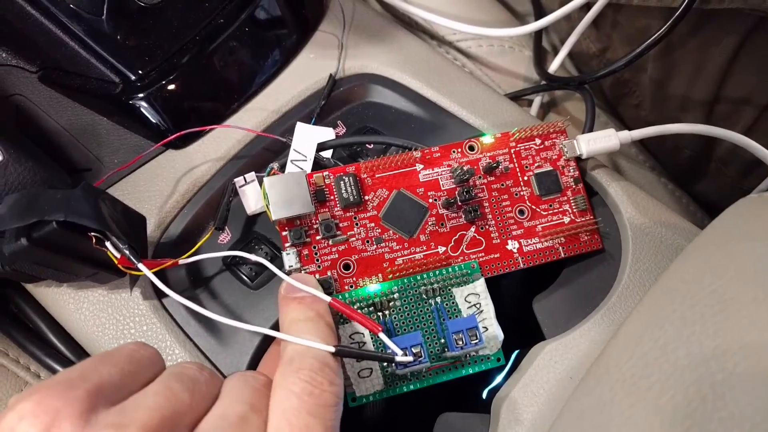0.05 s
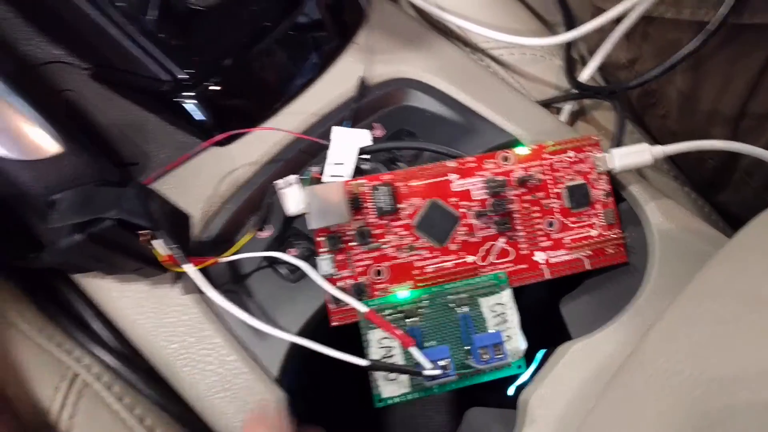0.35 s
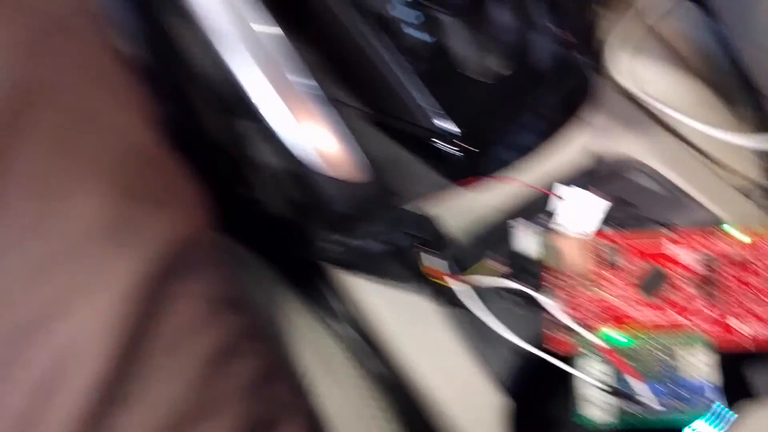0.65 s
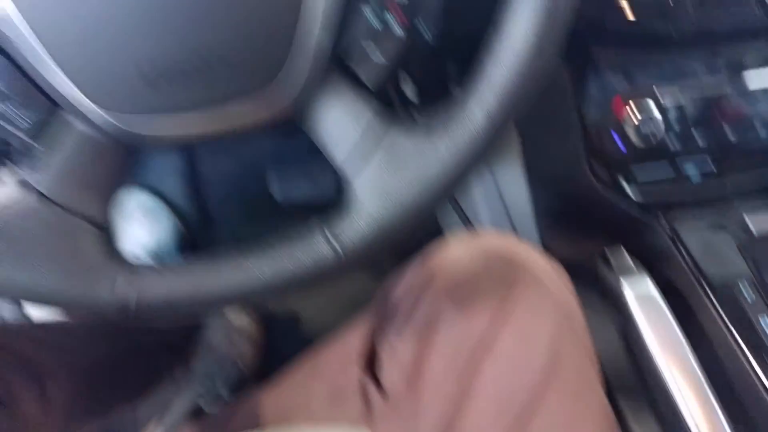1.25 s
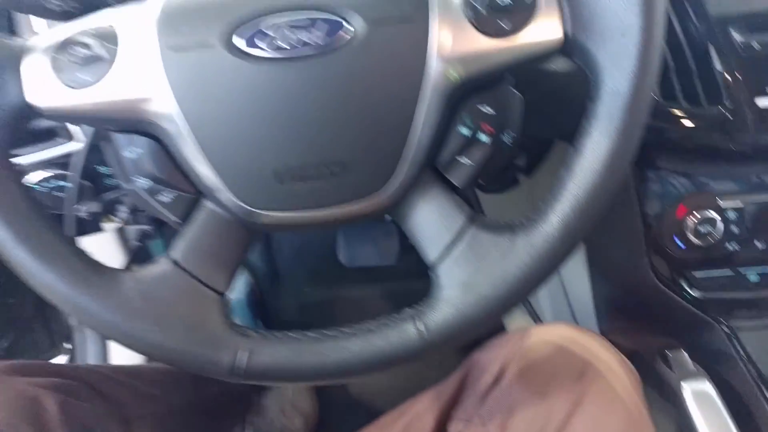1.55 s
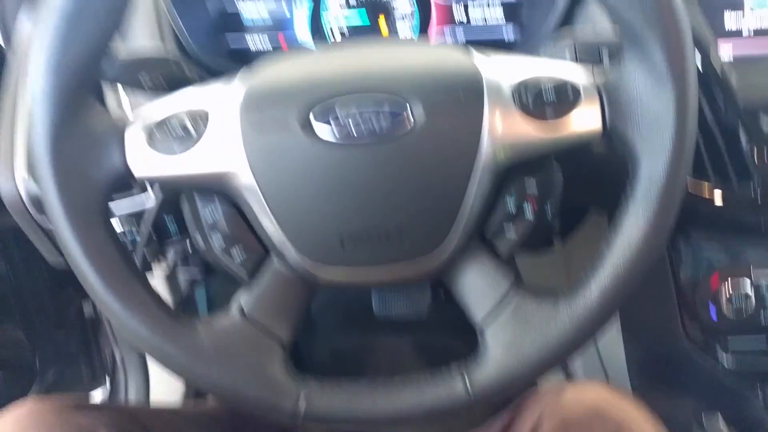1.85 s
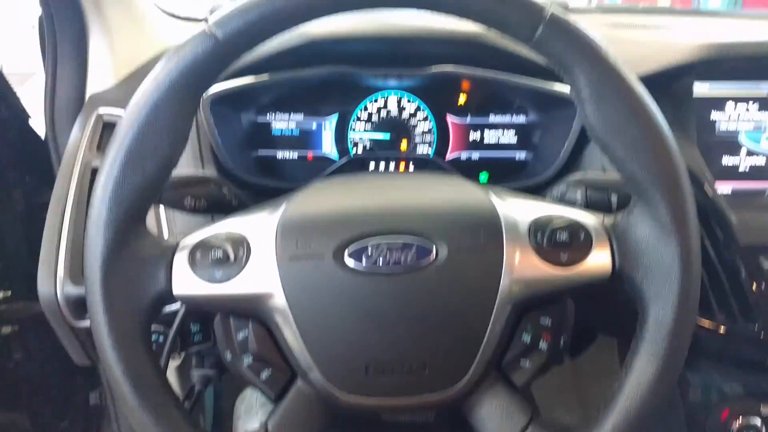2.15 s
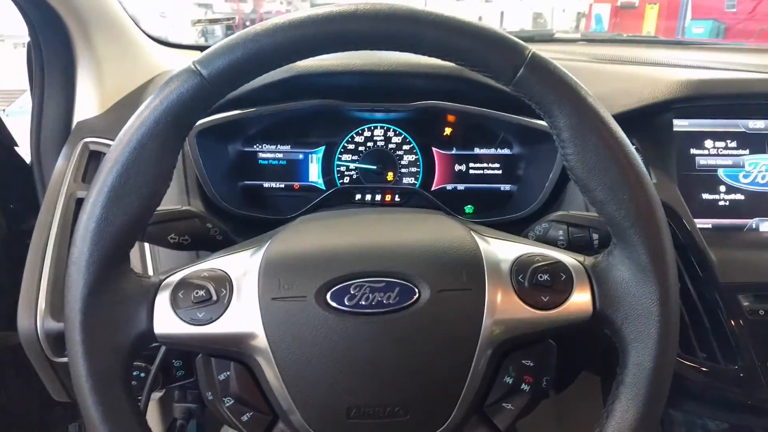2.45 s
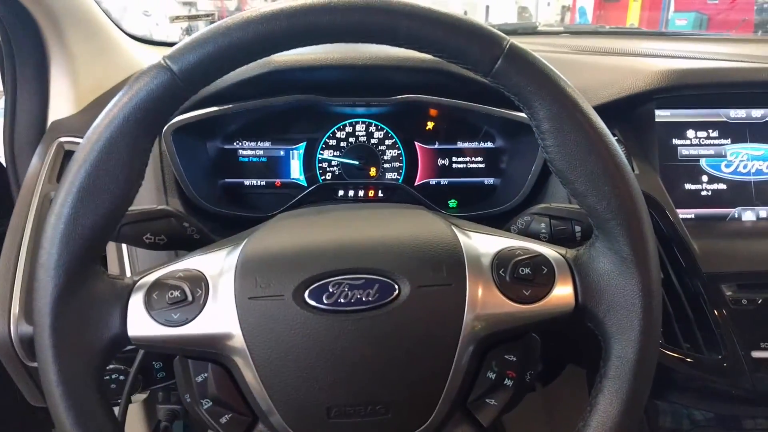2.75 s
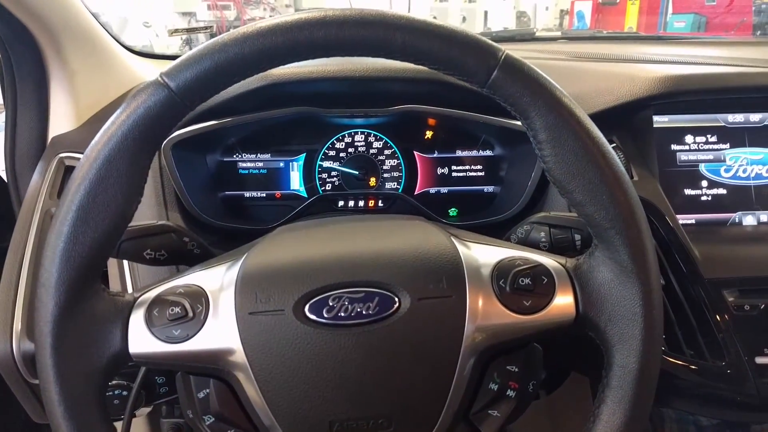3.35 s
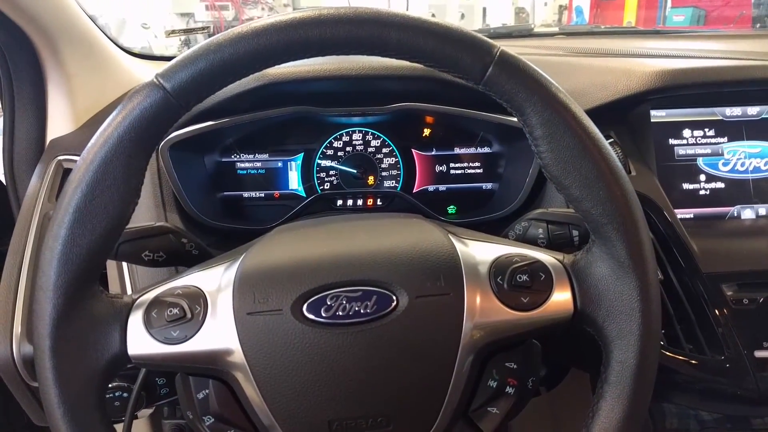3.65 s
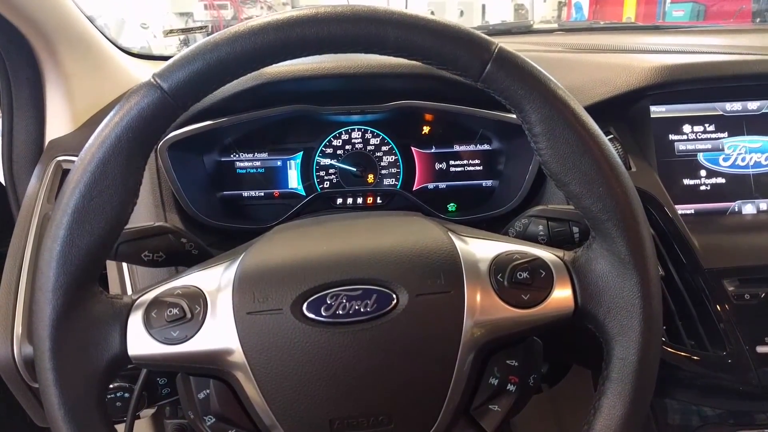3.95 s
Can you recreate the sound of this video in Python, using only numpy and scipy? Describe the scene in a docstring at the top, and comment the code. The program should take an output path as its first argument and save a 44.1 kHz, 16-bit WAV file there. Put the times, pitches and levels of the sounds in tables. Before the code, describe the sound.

An electric car's motor whines, rising in pitch over a swelling rumble and a few clicks.

```python
"""An electric car stands in a workshop, its motor at a crawl over a low hum and quiet cabin air.
As the motor starts to run up, plastic ticks, a hand lets go of a circuit board with a few taps,
clothing swishes and rubs the seat as the driver turns, and the console takes a few knocks.
The drivetrain's rumble, hiss and boom swell, the gears whine upward and the inverter sings above them
in clusters of rising side tones. One more sharp tick comes just past halfway; the motor keeps climbing."""
import sys
import numpy as np
from scipy import signal
from scipy.fft import rfft, irfft
from scipy.io import wavfile

SR = 44100
rng = np.random.default_rng(int(sys.argv[2]) if len(sys.argv) > 2 else 0)


def bounce(signal):
    """Save signal as a 16-bit WAV file at the path given by the first command-line argument."""
    frames = np.transpose(np.atleast_2d(signal))
    limited = np.clip(frames, -1, 1)
    pcm = np.round(limited * 32767).astype(np.int16)
    wavfile.write(sys.argv[1], SR, pcm)


N = 176400
T = np.arange(N) / SR
WORKSHOP_T60_S, CABIN_T60_S = .8, 0.037


def from_db(db):
    """Decibels to gain."""
    return 10 ** (np.asarray(db) / 20)


def rms_one(x):
    """Scale to an rms of 1."""
    return x / np.sqrt(np.mean(x ** 2) + 1e-20)


def drift(rate_hz):
    """Smooth random wander, rms 1."""
    step, settle = 40, 2000
    pole = np.exp(-2 * np.pi * step * rate_hz / SR)
    white = rng.standard_normal(N // step + settle + 2)
    slow = signal.lfilter([1], [1, -2 * pole, pole * pole], white)[settle:]
    return np.interp(np.arange(N) / step, np.arange(len(slow)), rms_one(slow))


def noise(colour):
    """White noise through an EQ curve, rms 1."""
    hz, db = np.transpose(colour)
    bins = np.maximum(np.fft.rfftfreq(N, 1 / SR), 1)
    gain = from_db(np.interp(np.log(bins), np.log(hz), db)) * np.minimum(bins / hz[0], 1)
    return rms_one(irfft(rfft(rng.standard_normal(N)) * gain, N))


def tone(hz, db):
    """A sine that follows a pitch and an rms level."""
    return np.sqrt(2) * from_db(db) * np.sin(2 * np.pi * (np.cumsum(hz) / SR + rng.random()))


def room(x, t60, wet):
    """Direct sound plus a diffuse dying tail, at about the same total power."""
    tail = rng.standard_normal(SR) * from_db(-60 * T[:SR] / t60)
    reverb = signal.fftconvolve(x, tail / np.linalg.norm(tail))[:N]
    return (x + wet * reverb) / np.hypot(1, wet)


# Mains tones at 60 and 240 Hz, plus a cabin resonance at 172 Hz: pitch_hz, level_db
HUM_TONES = [(60, -49), (172, -61), (240, -62)]
# Room tone EQ: freq_hz, gain_db
CABIN_AIR_EQ = [(25, -17), (55, -0.5), (100, -3.5), (170, -6), (260, -10.5), (350, -20.5), (600, -25.5),
                (1000, -29.5), (2300, -32.5), (5000, -34), (6800, -29), (8400, -23.5), (10500, -33),
                (13000, -37.5), (16000, -49.5)]

def hum_and_air(waver_db=2.2, air_db=-50.5):
    """The bed: a wavering low hum over the quiet air of the cabin."""
    hum = sum(tone(np.full(N, hz), db + waver_db * drift(10.7)) for hz, db in HUM_TONES)
    return hum + from_db(air_db) * noise(CABIN_AIR_EQ)


# The five speed points of the drive's level curves: motor_hz
SPEED_POINTS = [30, 48, 70, 95, 114]

def at_speed(motor_hz, levels_db):
    """Ride a level in dB with the motor speed."""
    return np.interp(motor_hz, SPEED_POINTS, levels_db)


# Rumble and hiss swells: level_db at each speed point
RUMBLE_LEVELS = [-60.5, -48.5, -43, -40, -41]
HISS_LEVELS = [-69.5, -63.5, -59, -52, -50.5]
# Their EQ curves: freq_hz, gain_db
RUMBLE_EQ = [(25, -15), (60, -7), (90, -2), (135, 2.5), (190, -6), (260, -7), (340, -21.5), (500, -42.5),
             (1000, -67), (3000, -92)]
HISS_EQ = [(150, -13), (330, -3), (520, -6.5), (750, -19.5), (1050, -21.5), (1700, -14), (2300, -26),
           (2600, -18), (2850, -24.5), (3600, -23), (4300, -24.5), (5000, -25.5), (5800, -23.5),
           (6800, -27.5), (8300, -5.5), (10000, -33), (13000, -28), (16000, -35)]

def drivetrain(motor_hz):
    """Low rumble and the rolling hiss of wheels and shafts, growing with speed."""
    rumble = from_db(at_speed(motor_hz, RUMBLE_LEVELS)) * noise(RUMBLE_EQ)
    hiss = from_db(at_speed(motor_hz, HISS_LEVELS)) * noise(HISS_EQ)
    return rumble + hiss


# Boom swell: level_db at each speed point
BOOM_LEVELS = [-60, -52.5, -48, -48.5, -51.5]

def cabin_boom(motor_hz, pitch_hz=170.9, width_hz=9.3):
    """Random shaking from the drivetrain rings one narrow air resonance of the cabin."""
    pole = np.exp(-np.pi * width_hz / SR)
    resonator = [1, -2 * pole * np.cos(2 * np.pi * pitch_hz / SR), pole * pole]
    ring = signal.lfilter([1, 0, -1], resonator, rng.standard_normal(N))
    return from_db(at_speed(motor_hz, BOOM_LEVELS)) * rms_one(ring)


# Resonant peaks of the drive housing: centre_hz, width_hz, boost_db
HOUSING_PEAKS = [(1594, 96, 6.5), (1786, 36, 3), (2950, 180, 22.5), (7720, 210, 4.5), (8320, 76, 4)]

def housing_db(hz):
    """The housing lifts a tone as it sweeps through a resonance."""
    return sum(boost / (1 + (2 * (hz - centre) / width) ** 2) for centre, width, boost in HOUSING_PEAKS)


# Pitch of each whine: motor_multiple
WHINE_ORDERS = [3.29, 16, 32]
# One row per whine: level_db at each speed point
WHINE_LEVELS = [(-86, -78, -73, -68, -61), (-85, -80, -75, -63.5, -62), (-96, -92, -87, -87, -90)]

def gears(motor_hz, waver_db=3.5, roughness=.25):
    """Slightly rough gear whines, locked to the motor speed."""
    whine = 0
    for order, levels in zip(WHINE_ORDERS, WHINE_LEVELS):
        hz = order * motor_hz
        db = at_speed(motor_hz, levels) + housing_db(hz) + waver_db * drift(34)
        whine += tone(hz, db) + roughness * drift(45) * tone(hz, db)
    return room(whine, WORKSHOP_T60_S, wet=.55)


# Pitch of each inverter tone, as a sum: switch_multiple, motor_multiple
INVERTER_TONES = [(1, 3), (2, -8), (2, -4), (2, -2), (2, 0), (2, 2), (2, 4), (2, 8), (3, -5), (3, -1),
                  (3, 1), (3, 5), (4, -2), (4, 2)]
# One row per tone: level_db at each speed point
INVERTER_LEVELS = [(-95, -90, -85, -80, -75), (-90, -85, -78, -77, -71), (-84, -72, -72, -74, -73),
                   (-67, -68, -65, -59.5, -55), (-74, -72, -70, -67, -62), (-67, -64, -64.5, -57, -52.5),
                   (-84, -80, -75, -72, -67), (-85, -76, -66, -68, -69), (-90, -84, -74, -70, -72),
                   (-88, -83, -75, -72, -69), (-88, -82, -76, -76, -71), (-92, -85, -80, -77, -76),
                   (-83, -77, -73, -78, -86), (-81, -78, -75, -75, -84)]

def inverter(motor_hz, switch_hz, waver_db=3.2):
    """High switching tones, split into side tones by the turning motor."""
    singing = 0
    for (switch_multiple, motor_multiple), levels in zip(INVERTER_TONES, INVERTER_LEVELS):
        hz = switch_multiple * switch_hz + motor_multiple * motor_hz
        db = at_speed(motor_hz, levels) + housing_db(hz) + waver_db * drift(14)
        singing += tone(hz, db)
    return room(singing, WORKSHOP_T60_S, wet=.7)


# Tick cues: start_s, level_db, snap_t60_s, tail_gain_db
TICK_CUES = [(.0218, -34, .007, -7), (2.1690, -24.5, .0022, -27)]
# Ring of the plastic: pitch_hz, gain_db
PLASTIC_MODES = [(4400, -10), (6300, -5), (8600, 0), (10000, -13)]
# Tail EQ: freq_hz, gain_db
TICK_TAIL_EQ = [(3000, -28), (4500, -9), (7500, -23), (9000, 11.5), (10500, -2), (12500, -4), (16000, -21)]

def plastic_ticks(tail_t60_s=0.085):
    """Small plastic parts snap, ring for a few milliseconds and leave a short bright rattle."""
    out, t, rattle = np.zeros(N), T[:SR // 4], noise(TICK_TAIL_EQ)
    ring = sum((-1) ** k * from_db(db) * np.sin(2 * np.pi * hz * t)
               for k, (hz, db) in enumerate(PLASTIC_MODES))
    for start, db, t60, tail_db in TICK_CUES:
        span = slice(int(start * SR), int(start * SR) + len(t))
        snap = ring * from_db(-60 * t / t60)
        tail = rattle[span] * from_db(tail_db - 60 * t / tail_t60_s)
        out[span] += from_db(db) * (snap + tail)
    return out


def struck(cues, modes, crack_eq, crack_db, crack_t60_s):
    """Each blow gives a short crack and rings the modes; a soft contact dulls the treble."""
    out, t, grit = np.zeros(N), T[:SR // 4], noise(crack_eq)
    ring = sum((-1) ** k * from_db(db - 60 * t / t60) * np.sin(2 * np.pi * hz * t)
               for k, (hz, db, t60) in enumerate(modes))
    for start, db, cutoff_hz in cues:
        span = slice(int(start * SR), int(start * SR) + len(t))
        crack = grit[span] * from_db(crack_db - 60 * t / crack_t60_s)
        softness = np.exp(-2 * np.pi * cutoff_hz / SR)
        out[span] += from_db(db) * signal.lfilter([1 - softness], [1, -softness], ring + crack)
    return out


# Tap cues: start_s, level_db, cutoff_hz
TAP_CUES = [(.071, -46, 1500), (.1655, -28, 9000), (.300, -44, 1490), (.313, -43, 2000)]
# Ring of the board: pitch_hz, gain_db, t60_s
BOARD_MODES = [(299, -10.5, 0.088), (775, -6.5, 0.06), (1297, 3, 0.013), (1465, -1, 0.016),
               (2290, -17, 0.032), (3050, -20, 0.039), (5663, -21, .02), (9200, -18, .03)]
# Attack EQ: freq_hz, gain_db
BOARD_CRACK_EQ = [(250, -15), (500, -27), (800, -17), (1350, -2), (2200, -11), (3400, -12), (4800, 2),
                  (7000, -16), (8500, 5), (10500, -3), (12000, -20), (16000, -20)]

def board_taps():
    """A circuit board clicks and rings briefly as the hand lets go."""
    return struck(TAP_CUES, BOARD_MODES, BOARD_CRACK_EQ, crack_db=-3, crack_t60_s=0.027)


def cloth(cues, colour, grain_db):
    """Grainy friction noise under strokes that swell, hold for the rest of their length, then fade."""
    envelope = 0
    for start, length, attack, release, db in cues:
        fade_in = np.clip((T - start) / attack, 0, 1)
        fade_out = np.clip(1 - (T - start - length) / release, 0, 1)
        envelope += from_db(db) * fade_in * fade_out
    return envelope * noise(colour) * from_db(grain_db * drift(150))


# Swish cues: start_s, length_s, attack_s, release_s, level_db
SWISH_CUES = [(.168, 0.038, 0.011, 0.02, -49.5), (.40, 0.36, 0.11, 0.46, -55.5),
              (1.349, 0.12, .008, 0.031, -42.5)]
# Airy EQ: freq_hz, gain_db
SWISH_EQ = [(500, -25.5), (2500, -28.5), (5500, -23.5), (6900, -14.5), (7700, -12.5), (8800, -2),
            (9700, -10.5), (10800, -15.5), (13000, -26), (16000, -28)]

def clothing_swishes():
    """Clothing slides with a bright swish as the driver turns."""
    return cloth(SWISH_CUES, SWISH_EQ, grain_db=1.0)


# Rub cues: start_s, length_s, attack_s, release_s, level_db
RUB_CUES = [(.48, 0.31, 0.079, 0.096, -64), (1.38, 0.26, 0.11, 0.054, -52), (1.62, .08, 0.075, 0.34, -58)]
# Fuller EQ: freq_hz, gain_db
RUB_EQ = [(400, 4), (1000, -3.5), (1600, 4), (2400, 1), (4500, -1.5), (6600, -3), (8500, 7), (10500, -7),
          (15000, -16)]

def seat_rubs():
    """Cloth drags on the seat, duller and grainier."""
    return cloth(RUB_CUES, RUB_EQ, grain_db=1.5)


# Knock cues: start_s, level_db, cutoff_hz
KNOCK_CUES = [(.719, -55, 3000), (.7835, -42, 3950), (.788, -63, 2500)]
# Ring of the console: pitch_hz, gain_db, t60_s
CONSOLE_MODES = [(433, 0, 0.047), (666, 0, 0.064), (938, -6.5, 0.074), (1200, -6, 0.056), (1710, 6, 0.013),
                 (2220, -7, .025), (3160, -18, .03)]
# Attack EQ: freq_hz, gain_db
CONSOLE_CRACK_EQ = [(200, -6), (450, -1), (1200, -7), (2400, -3.5), (3400, -17), (4500, -15), (12000, -36)]

def console_knocks():
    """Light blows ring the console in the midrange."""
    return struck(KNOCK_CUES, CONSOLE_MODES, CONSOLE_CRACK_EQ, crack_db=1, crack_t60_s=0.053)


# The run-up: time_s, motor_hz (electrical), switch_hz (inverter)
RUN_UP = [(0.0, 30.0, 3600), (0.4, 34.0, 3615), (0.7, 37.8, 3636), (1.0, 43.5, 3664), (1.3, 50.0, 3693),
          (1.6, 58.0, 3734), (1.9, 67.5, 3784), (2.2, 77.5, 3842), (2.5, 88.8, 3905), (2.75, 95.8, 3952),
          (3.0, 102.0, 3991), (3.3, 108.2, 4030), (3.6, 112.2, 4060), (4.0, 115.5, 4086)]

def scene():
    """The mono mix: taps and knocks get the cabin's short echo, ticks and cloth stay close and dry."""
    times, motor, switch = np.transpose(RUN_UP)
    motor_hz, switch_hz = np.interp(T, times, motor), np.interp(T, times, switch)
    drive = inverter(motor_hz, switch_hz) + gears(motor_hz) + drivetrain(motor_hz) + cabin_boom(motor_hz)
    clothing = clothing_swishes() + seat_rubs()
    impacts = room(board_taps() + console_knocks(), CABIN_T60_S, wet=.55)
    return (drive + clothing + impacts + plastic_ticks() + hum_and_air())[None]


def record(dry):
    """A steep high cut at 15.8 kHz."""
    return signal.sosfilt(signal.ellip(10, .3, 70, 15800, fs=SR, output="sos"), dry)


dry = scene()
out = record(dry)
bounce(out)
```